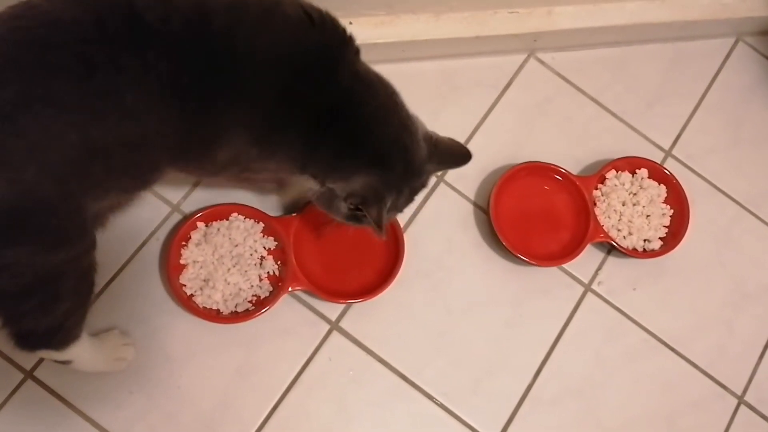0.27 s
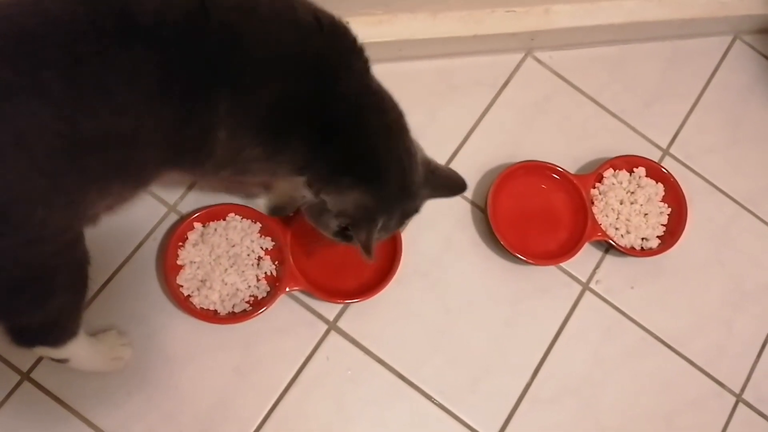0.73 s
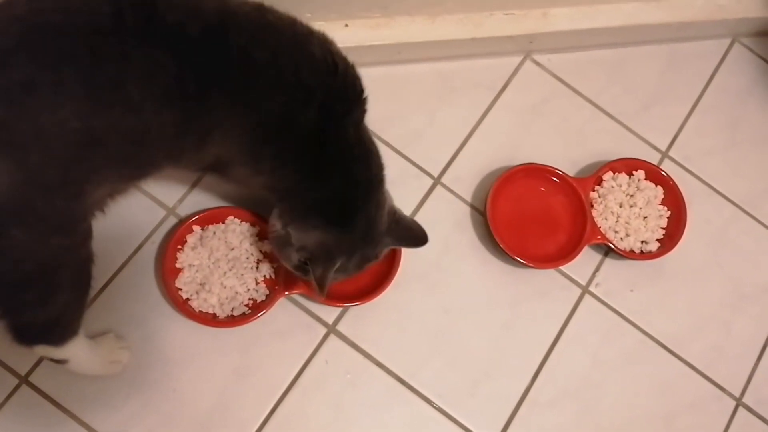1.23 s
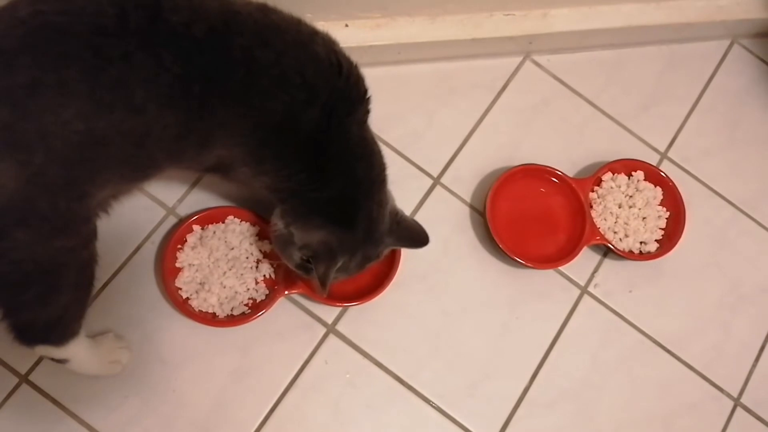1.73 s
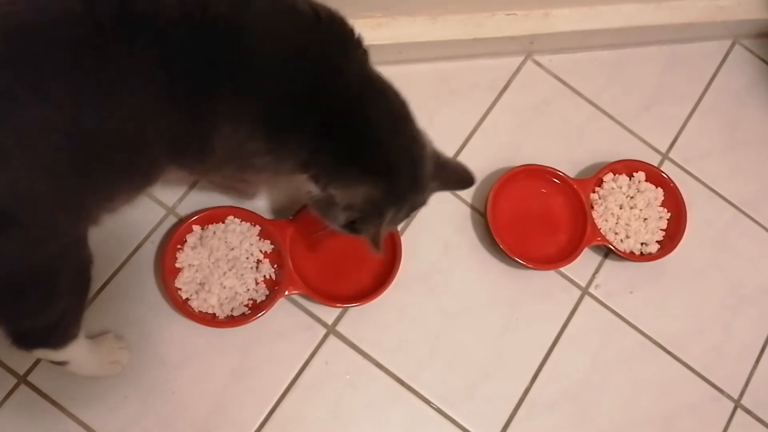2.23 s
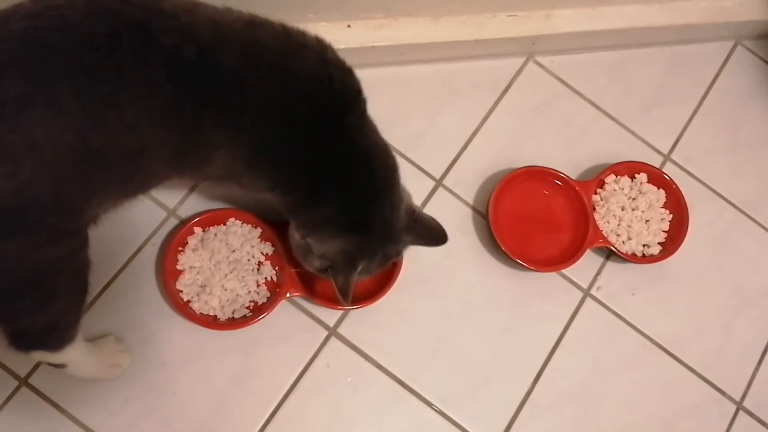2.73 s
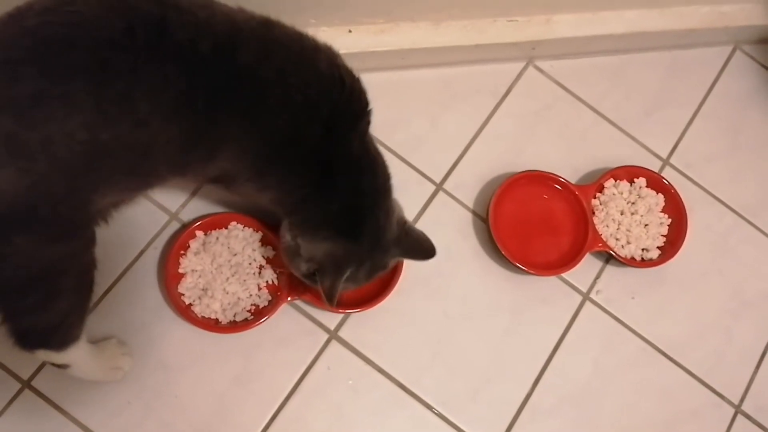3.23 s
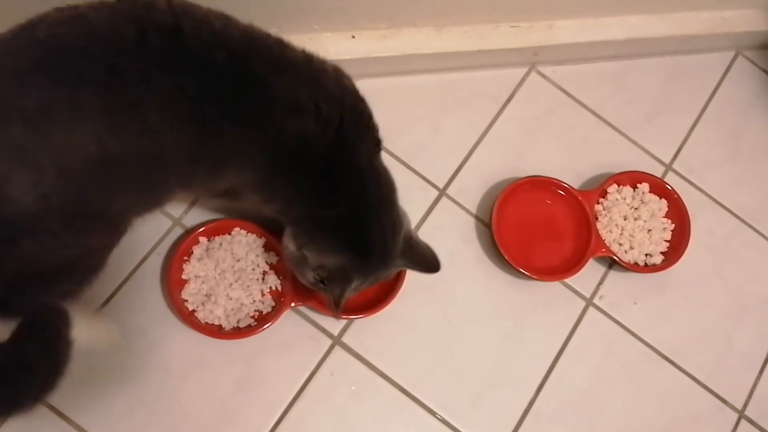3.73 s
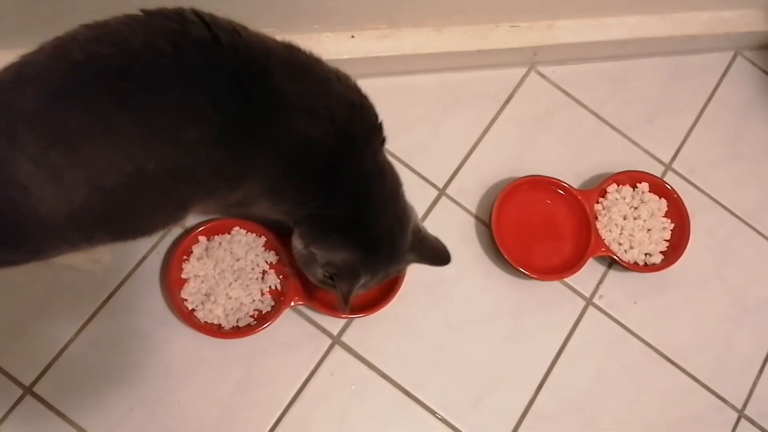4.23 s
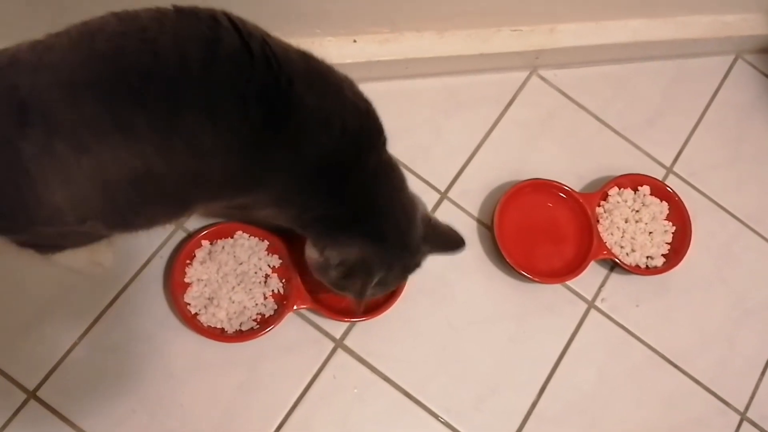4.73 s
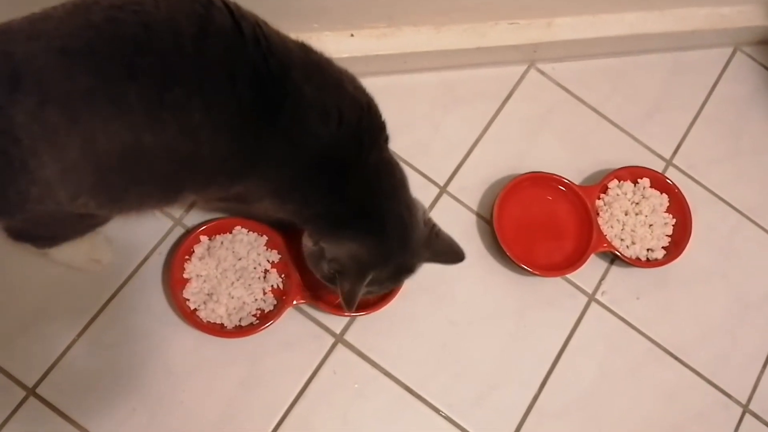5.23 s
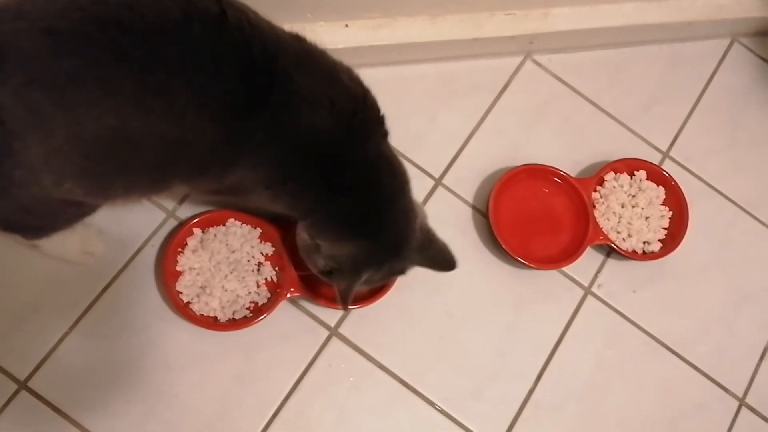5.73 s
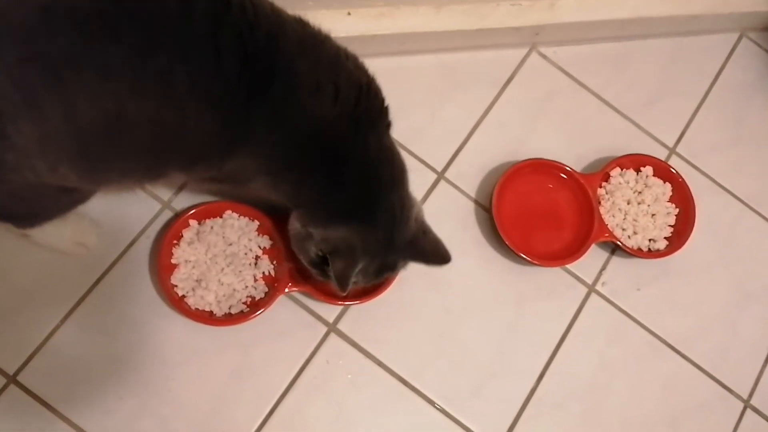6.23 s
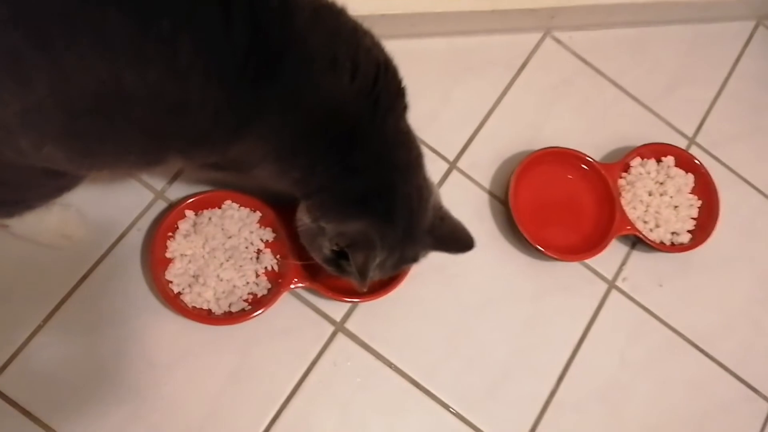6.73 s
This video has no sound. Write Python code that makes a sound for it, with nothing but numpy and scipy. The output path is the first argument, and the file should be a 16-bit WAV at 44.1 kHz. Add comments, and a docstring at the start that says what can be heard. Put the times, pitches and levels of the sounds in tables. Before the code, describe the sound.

A ceramic bowl rocks and chatters rapidly on hard floor tiles while a cat sniffs and laps at it, with soft wet smacks.

```python
"""A bowl rocks and chatters on tiles while a cat noses and laps at it, with sniffs, lip smacks and faint room tone.
Decaying sine waves make the bowl ring: its foot knocks on the floor, and teeth tap its rim.
The mouth makes short gliding plips with a fizz of noise, and lip smacks ring the open mouth.
Sniffs and wet licks are shaped hiss. A small hard room adds echoes to the cat and bowl."""
import sys
import numpy as np
from scipy import signal
from scipy.fft import rfft, irfft
from scipy.io import wavfile
from scipy.ndimage import uniform_filter1d

SR = 44100
rng = np.random.default_rng(int(sys.argv[2]) if len(sys.argv) > 2 else 0)


def dump_mix(stems):
    """Bounce the given channels to the path in sys.argv[1] as a 16-bit WAV at rate SR."""
    frames = np.atleast_2d(stems).T  # one column per channel
    limited = np.clip(frames, -1, 1)  # hard clip at full scale
    pcm = np.round(limited * 32767).astype(np.int16)
    wavfile.write(sys.argv[1], SR, pcm)


def ratio(d):
    """dB to gain"""
    e = np.asarray(d, float) / 20
    return 10 ** e


N = 307597  # length in samples, about 7 seconds

# The quiet background's tone. Each row: frequency in Hz, strength in dB per Hz.
ROOM_TONE_COLOUR = [(15, 1), (34, -2), (70, -8.5), (124, -15), (200, -13.5), (264, -18), (500, -21),
                    (1000, -24.5), (2060, -28), (3500, -32), (6000, -37), (7600, -40), (8300, -44),
                    (12000, -47), (15200, -50.5)]
# How wide the background is. Each row: frequency in Hz, side over middle in dB.
ROOM_TONE_WIDTH = [(25, -3.5), (125, -2.5), (500, -0.5), (2000, -0.5), (12000, 0.1)]
# Which way the background leans. Each row: frequency in Hz, left minus right in dB.
ROOM_TONE_PAN = [(60, -2.5), (110, -4.5), (200, -3.5), (380, -1.5), (700, 0.5), (1290, 0.5), (2380, 0),
                 (4400, -1), (8120, 0.5), (15000, -1)]
# How long the echoes last. Each row: frequency in Hz, time to fall 60 dB in seconds.
ECHO_T60 = [(100, 0.52), (1000, 0.27), (4000, 0.35), (12000, 0.046)]
# Where the muzzle sounds from. Each row: time in seconds, left minus right in dB.
MUZZLE_PAN = [(.1, 1.5), (.7, 2.5), (1.9, 3), (2.2, 1), (2.9, 3), (4.2, 5.5), (4.68, -1.5), (4.79, -7),
              (4.85, 0), (5.09, -4), (5.4, 0.5), (6.1, -1.5), (6.7, 1)]
# Sniffs and wet licks. Each row: loudest moment in seconds, level in dB, rise and fall in seconds
# (each spans 20 dB), share under 4 kHz in dB.
SNIFFS = [(.1, -71.5, .006, 0.061, -1), (.21, -78.5, 0.071, 0.58, 4), (.33, -81, 0.18, 0.087, 4.5),
          (.62, -71.5, .006, 0.1, 6.5), (.736, -61, 0.045, .07, 3.5), (.81, -80, .05, 0.2, 2),
          (1.948, -75.5, 0.055, 0.088, 2.5), (2.15, -64, 0.0045, 0.14, 0), (2.263, -59.5, 0.034, 0.052, -2),
          (2.33, -77, 0.055, .08, -13), (2.563, -61.5, 0.0296, 0.058, -13), (2.894, -70, 0.044, 0.12, -10),
          (2.94, -74, 0.046, 0.065, -3.5), (4.75, -66, 0.016, 0.089, 9.5), (4.82, -76.5, 0.073, 0.023, 3),
          (5.1, -79, 0.097, .08, 1.5), (5.303, -80, .008, 0.057, 14), (5.35, -84, .015, .02, 1.5)]
# Tone of the mouth part, nose part and thin top, in that order.
# Each row within a part: frequency in Hz, strength in dB per Hz.
SNIFF_COLOURS = [
    [(400, 2), (800, -4), (2400, 0), (3600, -3.5), (5000, -24), (7000, -56)],
    [(2500, -38.5), (4200, 0), (7000, -3.5), (9600, -1), (11000, -29), (14000, -38)],
    [(7000, -45), (10000, 3.5), (12500, -5.5), (15000, -12.5)],
]
# Short gliding plips of the mouth; the first two are the bright ring of lip smacks.
# Each row: start in seconds, peak in dB, starting pitch in Hz, time to fall 60 dB in seconds.
PLIPS = [(.611, -48, 5060, .012), (2.152, -44.5, 5150, .012), (3.887, -60.5, 2160, .012),
         (4.094, -63.5, 2390, .011), (4.182, -57.5, 2073, .011), (4.521, -65.5, 2150, 0.013),
         (4.676, -55.5, 5140, .0087), (4.682, -52.5, 2750, 0.0049), (4.691, -56, 1980, .0089),
         (4.748, -55, 956, 0.013), (4.755, -48.5, 2380, 0.034), (4.771, -48, 3470, 0.014),
         (4.79, -52.5, 4760, .0099), (4.79, -39.5, 1466, 0.043), (4.803, -45, 1665, .022),
         (4.815, -49, 1960, 0.022), (4.83, -62, 1450, 0.023), (5.043, -61, 2410, .011),
         (5.056, -56, 3010, 0.0041), (5.07, -54.5, 5470, 0.014), (5.087, -61.5, 3180, .012),
         (5.089, -52, 5100, .012), (5.11, -53.5, 4550, 0.036), (5.112, -55, 2090, 0.036),
         (5.113, -61.5, 2920, .014), (5.14, -57, 4660, .016), (5.358, -57.5, 2290, 0.026),
         (5.392, -62.5, 2390, 0.011), (5.614, -64.5, 2510, .011), (5.653, -65.5, 2420, .012),
         (5.773, -62, 2260, .013), (5.927, -68, 2190, .011), (6.003, -65.5, 2220, .011),
         (6.141, -60, 2210, 0.019), (6.261, -68, 2050, .012), (6.716, -66, 983, .019)]
# Lip smacks. Each row: start in seconds, peak in dB, share under 1.8 kHz in dB,
# share above 4 kHz in dB, left minus right in dB.
SMACKS = [(0.1, -57, -13, -22, 15), (0.61, -40, -17, -22, 8), (0.611, -48, -23, -4, -14),
          (1.914, -50, -26, -28, 6), (2.152, -43.5, -23, -20.5, 11), (3.745, -57.5, -2.5, -21.5, 2),
          (3.899, -60, -17.5, -15.5, 6), (3.946, -58.5, -4, -27, 6), (4.682, -47.5, -25.5, -27, -2.5),
          (4.75, -54, -8, -22.5, 6), (5.111, -50, -26, -1.5, -6), (5.306, -58, -8, -38, -3.5),
          (5.569, -67, -13, -4.5, -15), (5.63, -62, -2, -16.5, -6.5), (5.773, -61, -24.5, -11.5, -12.5),
          (6.495, -64.5, 1, -24.5, 3)]
# Resonances of the open mouth. Each row: frequency in Hz, width in Hz, strength in dB.
MOUTH_MODES = [(990, 440, 8), (1530, 750, 12), (2315, 840, 0.5), (3040, 2300, -9), (5100, 290, 5),
               (7600, 360, 1), (9800, 800, 1), (11850, 2000, -12.5)]
# Ringing tones of the bowl on tile. Each row: frequency in Hz, time to fall 60 dB in seconds,
# strength in dB when the foot knocks, strength in dB when the rim is tapped, left minus right in dB.
BOWL_MODES = [(114.1, 0.14, -14.5, -43.5, 0), (200.9, 0.14, -15, -38.5, 3), (303, 0.088, -13, -41.5, 0.5),
              (364, .07, -6, -41, 4), (404.5, 0.045, -8.5, -45.5, 1.5), (452.4, 0.11, -2.5, -46.5, 5.5),
              (477.8, 0.12, -1, -42.5, 3.5), (528.5, 0.09, -4.5, -33, 1.5), (586, 0.063, -8.5, -47.5, -11),
              (708.5, 0.039, -10, -46, -3), (839, 0.065, -8, -42, -3), (901.7, 0.089, -6.5, -39, 11),
              (957.3, .11, -2, -42, 3), (1122.5, 0.062, -11, -40.5, -4.5), (1240, 0.0077, -8, -13, 0.5),
              (1317.5, 0.031, 5.5, -32, 6), (1475.5, 0.041, -1, -19.5, -5), (1553.6, 0.05, -1.5, -28, 2),
              (1689, 0.036, -7, -29, -3), (1855, 0.055, 2, -31, -1.5), (2050, 0.034, 3.5, -29.5, 1.5),
              (2255, 0.014, -0.5, -25, 2.5), (2350, .06, -0.5, -22, 19.5), (2420, 0.12, -0.5, 0, 10),
              (2572, 0.035, 5.5, -32, -2.5), (2750, 0.028, -21, -37.5, 9), (2993, 0.15, -10, -4.5, -9),
              (3695, 0.23, -23, -2.5, -6.5), (4200, 0.2, -29, -12, -5), (5190, 0.2, -41, -14, -2),
              (5766, 0.13, -47.5, -4.5, 3.5), (5540, 0.11, -51, -12.5, -6), (7370, .09, -48, -5.5, -8),
              (9620, 0.16, -47, -12.5, 7.5)]
# Taps on the rim. Each row: start in seconds, peak in dB, pitch the struck spot favours in Hz,
# spread in octaves, crack relative to the tap in dB.
RIM_TAPS = [(0.727, -55.5, 9620, 0.081, -20), (0.989, -54, 5170, 1, -10), (2.198, -57, 3695, 0.25, -25),
            (2.261, -49.5, 4320, 0.7, -8), (2.536, -58.5, 3900, 0.18, -8), (2.565, -43, 4930, 0.57, -6),
            (3.118, -62.5, 3695, 0.56, -12), (3.144, -56, 6400, 0.52, -9), (4.79, -58.5, 5190, .05, -20),
            (5.358, -61, 5190, 0.081, -14.5), (5.358, -59.5, 7370, 0.23, -19)]
# The rocking foot lands on the tile. Each row: time in seconds, peak in dB, share near 0.9 kHz in dB,
# share above 1.9 kHz in dB, touch just before, relative to the landing, in dB.
LANDINGS = [(2.285, -27, -5, -15, -3), (2.329, -28.5, -5.5, -16.5, -6), (2.372, -30, -8, -21, -0.5),
            (2.408, -28.5, -5.5, -18, -13.5), (2.446, -31, -3.5, -19, -7.5), (2.481, -34, -3, -25, -9),
            (2.513, -31.5, -8, -28.5, -16), (2.536, -26.5, -3.5, -21.5, -17.5), (2.548, -25, -9, -27, -18),
            (2.565, -17, -4, -8.5, -14), (2.591, -19, -2.5, -8, -4.5), (2.603, -24, -5.5, -14, -27),
            (2.649, -28, -6, -8, 2.5), (2.696, -27, -9, -5.5, 2.5), (2.739, -29.5, -10, -16.5, 0.5),
            (2.785, -30.5, -4, -17, -0.5), (2.822, -31.5, -6, -16.5, -14), (2.858, -32.5, -2, -25, -19),
            (2.895, -37, -3, -39, -20), (2.929, -48.5, -2, -34, -18), (2.953, -38, -7, -38, -19),
            (2.984, -41, -5, -45, -20)]
# Light wobbles of the bowl: two small ones, then the big rocking dying away.
# Each row: start in seconds, first peak in dB, first share near 0.9 kHz in dB, fade per rock in dB.
WOBBLES = [(.305, -51.5, -14, 2.1), (.736, -45.5, -2, 1.55), (3.03, -53, -13.5, 1.9)]


def colour(x, points):
    """Shape the tone by (Hz, dB) points joined on a log frequency axis."""
    hz, db = np.transpose(points)
    f = np.arange(x.shape[-1] // 2 + 1) * SR / x.shape[-1] + 1  # 1 Hz up, to avoid log of zero
    gain = ratio(np.interp(np.log(f), np.log(hz), db))
    return irfft(rfft(x) * gain, x.shape[-1])


def unit(x):
    """Scale to an rms (average strength) of 1."""
    return x / np.sqrt(np.mean(x ** 2))


def rings(hz, t60, length_s, rise_cycles):
    """Make one decaying sine per row, swelling smoothly over a few cycles."""
    t = np.arange(int(length_s * SR)) / SR
    rise = np.sin(np.pi / 2 * np.clip(t * np.c_[hz] / rise_cycles, 0, 1)) ** 2
    decay = np.exp(-np.log(1000) * t / np.c_[t60])
    return rise * decay * np.sin(2 * np.pi * np.c_[hz] * t)


def pan(db):
    """Left and right gains for a level difference."""
    return ratio(np.array([db, -db]) / 2)


def muzzle_pan(s):
    """Left and right gains for a sound from the muzzle at s seconds."""
    return pan(np.interp(s, *np.transpose(MUZZLE_PAN)))


def add(out, s, sound, peak_db):
    """Mix a stereo sound in at s seconds; the peak is that of its left-right average."""
    i = int(s * SR)
    sound = sound[:, :N - i]
    out[:, i:i + sound.shape[1]] += sound * ratio(peak_db) / np.abs(sound.mean(axis=0)).max()


def chatter(decay_ms, share):
    """One hit followed by smaller random ones that die away."""
    ms = np.arange(1024) * 1000 / SR
    hits = share * rng.standard_normal(1024) ** 3 * np.exp(-ms / decay_ms)
    hits[0] = 1
    return hits[None]


def burst(lo_hz, hi_hz, decay_s):
    """A short dying noise in a band, partly different left and right."""
    t = np.arange(4096) / SR
    rise_s = .002
    noise = rng.standard_normal((2, 4096)) * np.exp(-t / decay_s) * np.clip(t / rise_s, 0, 1)
    band = signal.butter(4, [lo_hz, hi_hz], "band", fs=SR, output="sos")
    return signal.sosfilt(band, noise + noise[0])


def room_tone():
    """Air, house rumble and microphone hiss as coloured noise, more alike left and right in the bass."""
    mid, side = colour(rng.standard_normal((2, N)), ROOM_TONE_COLOUR)
    scale = ratio(-67.5) / mid.std()  # level of the middle, before the lean to left or right
    side = colour(side, ROOM_TONE_WIDTH)
    left = colour(mid + side, [(hz, db / 2) for hz, db in ROOM_TONE_PAN])
    right = colour(mid - side, [(hz, -db / 2) for hz, db in ROOM_TONE_PAN])
    return scale * np.array([left, right])


def room(x):
    """Dense echoes off tiles and walls: bass lasts longest, the top dies first, left and right unrelated."""
    wet_db = -11.0
    t = np.arange(int(.6 * SR)) / SR
    hz, t60 = np.transpose(ECHO_T60)
    echo = 0
    for centre in 90 * 2. ** np.arange(8):  # one band per octave
        shape = [(centre / 2, -40), (centre / 1.3, 0), (centre * 1.3, 0), (centre * 2, -40)]
        band = colour(rng.standard_normal((2, len(t))), shape)
        band_t60 = np.interp(np.log(centre), np.log(hz), t60)
        echo = echo + band * np.exp(-np.log(1000) * t / band_t60)
    echo = echo * np.clip((t - .003) / 0.0031, 0, 1)  # silent for 3 ms, then fades in
    echo = echo / np.sqrt(np.sum(echo ** 2, axis=1, keepdims=True))
    mono = x.mean(axis=0, keepdims=True)
    return ratio(wet_db) * signal.fftconvolve(mono, echo, axes=1)[:, :N]


def sniffs():
    """Air through the nose: grainy hiss with a duller part in the mouth and a thin top."""
    top_db = -9
    t = np.arange(N) / SR
    grain = ratio(1.5 * unit(uniform_filter1d(rng.standard_normal(N), size=200)))  # level flutters 1.5 dB rms
    low, mid, top = (unit(colour(grain * rng.standard_normal((2, N)), shape)) for shape in SNIFF_COLOURS)
    nose, mouth = np.zeros(N), np.zeros(N)
    for s, db, rise_s, fall_s, low_db in SNIFFS:
        swell = ratio(db - 20 * np.maximum((s - t) / rise_s, (t - s) / fall_s))
        nose += swell
        mouth += ratio(low_db) * swell
    return muzzle_pan(t) * (nose * (mid + ratio(top_db) * top) + mouth * low)


def faint_plips(count):
    """Small plips at random moments, as rows like those of PLIPS."""
    return [(np.interp(a, [0, 1], (3.6, 6.7)), -66.5 + 4 * b, 2180 * (0.893 + .2 * c), 0.0054)
            for a, b, c in rng.random((count, 3))]


def mouth_plips():
    """Short dying tones glide up, as small air pockets do when they close, in a fizz of narrow noise."""
    fizz_db, fizz_s = -8.5, .018  # relative to the plip; decay time
    spread = 1 + 0.087  # the fizz reaches this ratio above and below the pitch
    out = np.zeros((2, N))
    t = np.arange(4096) / SR
    for s, db, hz, t60 in PLIPS + faint_plips(count=6):
        fade = t / t60
        glide = np.sin(2 * np.pi * hz * t * (1 + 0.1 * fade))
        rise = np.clip(t * hz / 2.2, 0, 1) ** 2
        plip = glide * np.exp(-np.log(1000) * fade) * rise
        sides = np.c_[muzzle_pan(s)]
        add(out, s, sides * signal.fftconvolve(plip[None], chatter(3.5, .04)), db)
        add(out, s, sides * burst(hz / spread, hz * spread, fizz_s), db + fizz_db)
    return out


def lip_smacks():
    """Clicks ring the open mouth; a wider resonance dies sooner."""
    out = np.zeros((2, N))
    hz, width, gain_db = np.transpose(MOUTH_MODES)
    modes = rings(hz, np.log(1000) / (np.pi * width), .02, rise_cycles=1.7)
    for s, db, low_db, high_db, pan_db in SMACKS:
        click = ratio(gain_db + (hz < 1800) * low_db + (hz > 4000) * high_db) @ modes
        add(out, s, np.c_[pan(pan_db)] * signal.fftconvolve(click[None], chatter(3.1, 0.023)), db)
    return out


def knocks(count):
    """List each contact of foot and tile: time in seconds, peak, then low, middle and high share in dB."""
    rock_s, scatter = .019, 0.296  # time per rock; share of a rock by which a contact may be late
    rows = []
    for s, db, low_db, high_db, touch_db in LANDINGS:
        # the far edge of the foot touches first, dully
        rows.append((s - .011, db + touch_db, -7.5, -6, -30.5))
        mid_db = 12.5 + low_db + 0.6 * high_db  # near 1.4 kHz: follows both shares
        rows.append((s, db, low_db, mid_db, high_db))
    for s, db, low_db, fade_db in WOBBLES:
        for k in range(count):
            late_s = scatter * rock_s * min(k, 1) * rng.random()  # the first contact is on time
            # each rock is weaker, and its share near 0.9 kHz drops 3 dB
            rows.append((s + k * rock_s + late_s, db - k * fade_db, low_db - k * 3, -32, -31.5))
    return rows


def bowl():
    """Foot knocks and rim taps ring the same modes; knocks also grind on the tile, and taps crack."""
    grit_db, grit_upper_db, grit_s = -13, -6, .012  # relative to the knock; extra for upper bands; decay time
    out = np.zeros((2, N))
    hz, t60, knock_db, tap_db, pan_db = np.transpose(BOWL_MODES)
    modes, sides = rings(hz, t60, 0.34, rise_cycles=4.2), pan(pan_db)
    for s, db, low_db, mid_db, high_db in knocks(count=9):
        # a harder contact feeds the upper modes
        share = np.interp(hz, [636, 780, 970, 1170, 1690, 1900],
                          [0, low_db, low_db, mid_db, mid_db, high_db])
        uneven_db = 2.5 * rng.standard_normal(len(hz))  # no two knocks ring quite alike
        body = (sides * ratio(knock_db + share + uneven_db)) @ modes
        add(out, s, signal.fftconvolve(body, chatter(4.5, .02)), db)
        grit = burst(250, 792, grit_s)
        grit = grit + ratio(mid_db + grit_upper_db) * burst(800, 1700, grit_s)
        grit = grit + ratio(high_db + grit_upper_db) * burst(1700, 2990, grit_s)
        add(out, s, grit, db + grit_db)
    crack_band = signal.butter(3, [3200, 8000], "band", fs=SR, output="sos")
    for s, db, spot_hz, spread, crack_db in RIM_TAPS:
        # modes far from the favoured pitch ring less
        gains = ratio(tap_db - 5.7 * (np.log2(hz / spot_hz) / spread) ** 2)
        add(out, s, (sides * gains) @ modes, db)
        crack = rng.standard_normal((2, 1024)) * np.exp(-np.arange(1024) / (0.0011 * SR))
        add(out, s, signal.sosfilt(crack_band, crack), db + crack_db)
    return out


def scene():
    """Cat and bowl in the room; their direct sound reaches the right port a little late."""
    right_lag_ms = 0.068
    near = bowl() + mouth_plips() + lip_smacks() + sniffs()
    f = np.arange(N // 2 + 1) * SR / N
    late = np.exp(-2j * np.pi * f * right_lag_ms / 1000)  # a delay that need not be whole samples
    direct = np.array([near[0], irfft(rfft(near[1]) * late, N)])
    return direct + room(near) + room_tone()


def low_pass(x):
    """Removes everything above the highest recorded frequency."""
    return signal.sosfilt(signal.butter(12, 15640, fs=SR, output="sos"), x)


def record(dry):
    """The phone steeply cuts the treble above 15.2 kHz."""
    top_cut = signal.ellip(8, .2, 60, 15200, fs=SR, output="sos")
    finished = signal.sosfilt(top_cut, dry)
    return low_pass(finished)


dry = scene()
out = record(dry)
dump_mix(out)
```